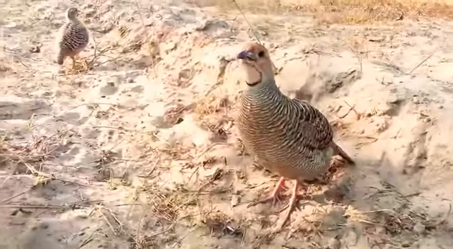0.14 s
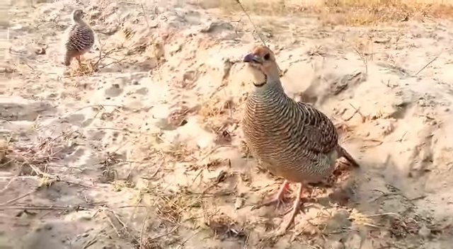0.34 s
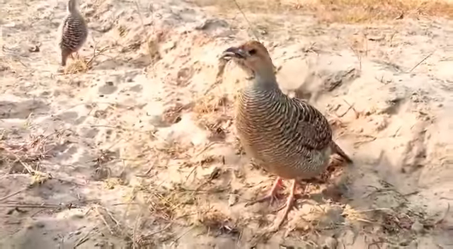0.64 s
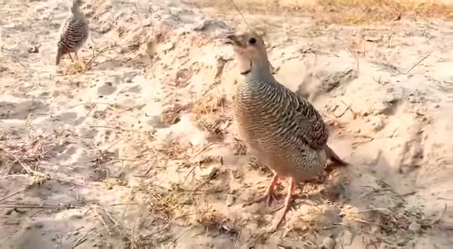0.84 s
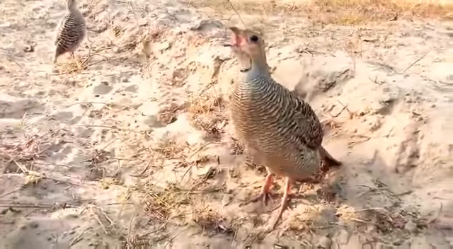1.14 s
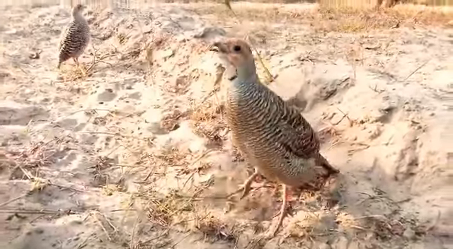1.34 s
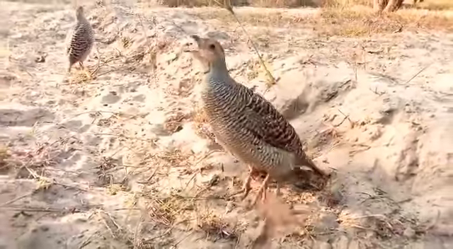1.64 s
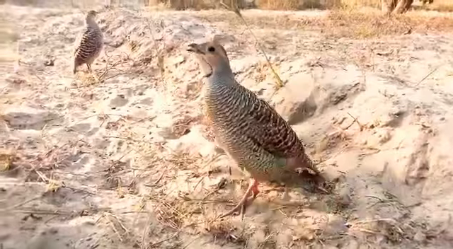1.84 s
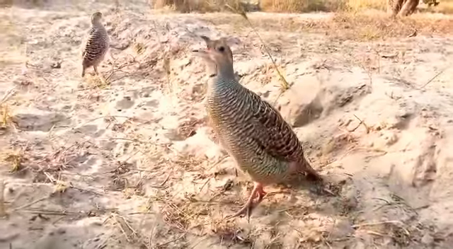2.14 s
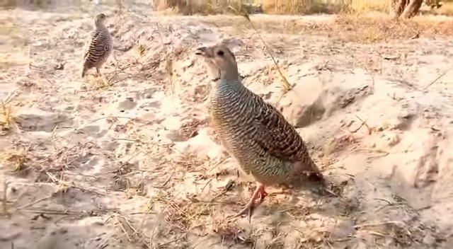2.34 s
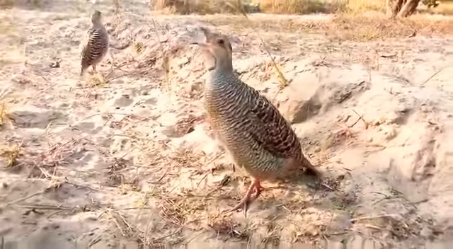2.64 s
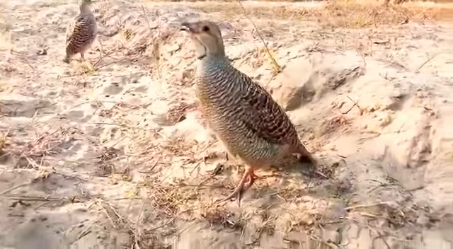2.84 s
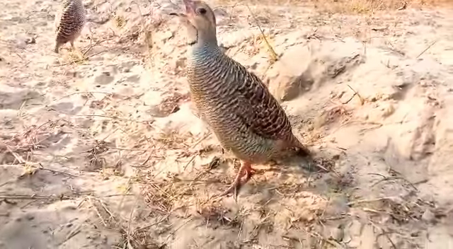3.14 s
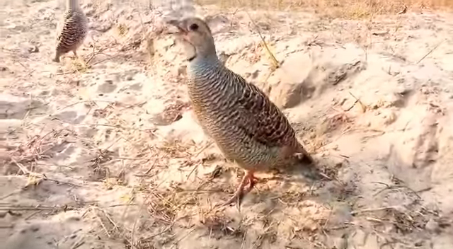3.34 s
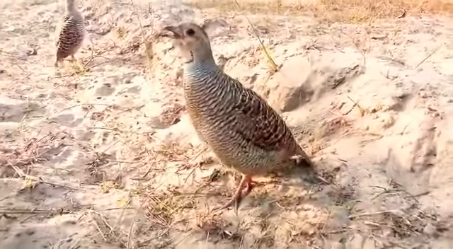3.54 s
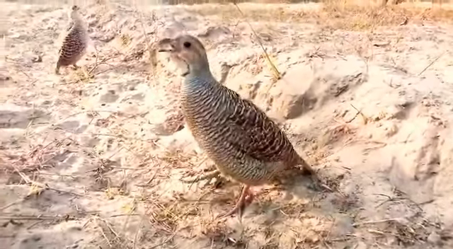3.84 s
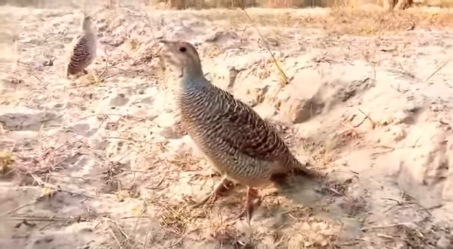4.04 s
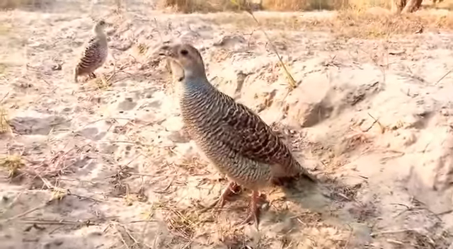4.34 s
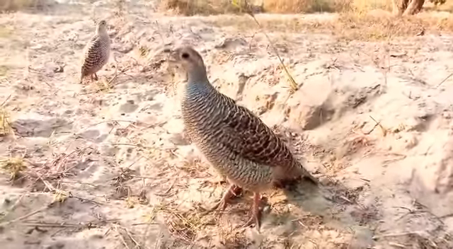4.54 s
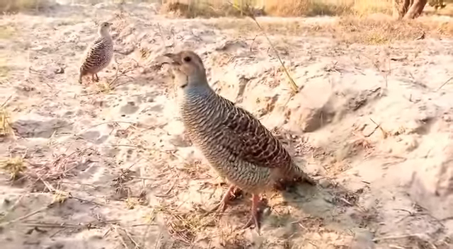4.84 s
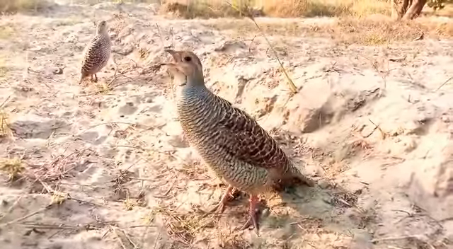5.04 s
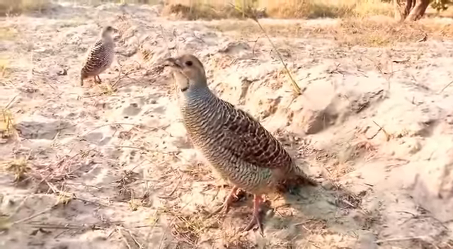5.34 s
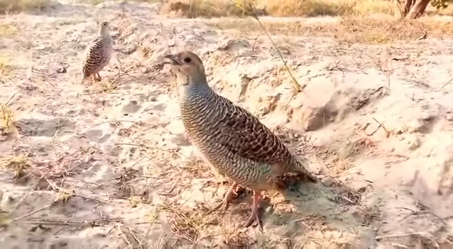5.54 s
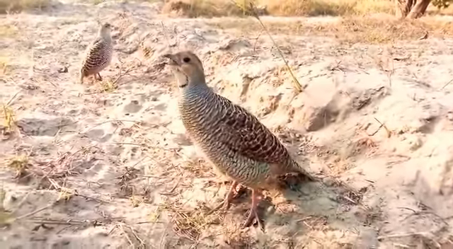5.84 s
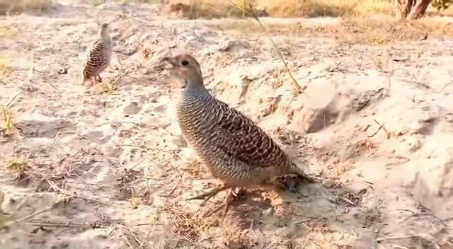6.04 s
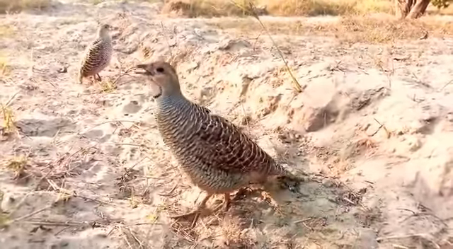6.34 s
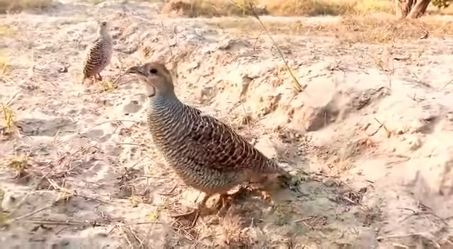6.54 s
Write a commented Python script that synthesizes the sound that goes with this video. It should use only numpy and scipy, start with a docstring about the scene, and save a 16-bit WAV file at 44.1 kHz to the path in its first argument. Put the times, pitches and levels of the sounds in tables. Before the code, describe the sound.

A quiet outdoor space with very faint hiss and low lumpy wind. In the first 0.2 seconds a distant hoarse caw is barely there, and a soft puff of wind bumps the microphone near 0.24. At about 0.25 to 0.45 a partridge close by gives one breathy shrill whistle, rising and dipping slightly at the end. From 0.5 it launches a fast, even run of thirteen phrases, roughly one every half second, lasting until about 6.7. The first starts without a cluck; later ones open with a short throaty cluck, then a hoarse lead-in snapping up to a piercing flat whistle, a rasp, one or mostly two short lower pipes, and a quick guttural falling tail. The phrases are loud, dry and strident, with brief gaps and a faint shrill echo from far trees. A thin falling chirp sounds distantly near 4.4.

```python
"""A ground bird calls nearby: one shrill whistle, then a fast run of phrases. A phrase is a cluck
(not in the first), lead-in, whistle, one or two pipes split by rasps, and a falling tail. Rough notes
are unsteady pulses through a throat; clean ones are sine stacks with breath. Far trees echo the bird
as sparse filtered taps, over wind of filtered noise, a puff, hiss, a pulsed caw and a gliding chirp."""
import sys
import numpy as np
from scipy import signal
from scipy.fft import rfft, irfft
from scipy.io import wavfile
from scipy.ndimage import uniform_filter1d

SR = 44100
rng = np.random.default_rng(int(sys.argv[2]) if len(sys.argv) > 2 else 0)


def put_to_file(sound):
    """Save the sound as 16-bit audio at rate SR, in the file named by the first command-line argument."""
    columns = np.atleast_2d(sound).T  # one column per channel
    safe = np.clip(columns, -1, 1)
    whole_steps = np.round(safe * 32767)
    wavfile.write(sys.argv[1], SR, whole_steps.astype(np.int16))


N = 295029
EDGE_HZ = 16200  # upper band limit

# throat colour with the beak open: [f/Hz, relative level/dB]
OPEN_BEAK = [(300, -39), (1100, -21), (1650, -20), (2300, -9), (3000, -2.5), (4500, 3.5), (6500, -4),
             (7300, -13.5), (9700, -19), (11500, -34), (14800, -23.5), (16300, -22)]
# throat colour with the beak shut: [f/Hz, relative level/dB]
SHUT_BEAK = [(300, -4.5), (600, -32), (1150, -23), (1800, -1.5), (2350, 6), (3300, -11), (4600, -14.5),
             (6600, -16.5), (8500, -31), (11500, -52.5), (14800, -34.5), (16300, -44)]


def gain_of(db):
    """Decibels to gain."""
    return 10 ** (np.asarray(db) / 20)


def evened(x):
    """Scales to rms 1."""
    return x / np.sqrt(np.mean(x ** 2) + 1e-20)


def read(points, hz):
    """Reads a spectrum table on a log-frequency axis."""
    f, value = np.transpose(points)
    return np.interp(np.log(hz + 1), np.log(f + 1), value)


def add(mix, s, sound):
    """Mixes a sound in at s seconds."""
    part = mix[round(s * SR):][:len(sound)]
    part += sound[:len(part)]


def wobble(shape, hz):
    """Smoothed noise of about rms 1 that changes about hz times a second."""
    width = max(round(SR / hz / 2), 1)
    raw = rng.standard_normal(shape)
    smooth = uniform_filter1d(uniform_filter1d(raw, width, -1), width, -1)
    return smooth * np.sqrt(1.5 * width)


def coloured(x, points):
    """Filters x by a spectrum table, to rms 1."""
    gains = gain_of(read(points, np.fft.rfftfreq(len(x), 1 / SR)))
    return evened(irfft(rfft(x) * gains, len(x)))


def along(length, places, values):
    """A curve over a note with rounded corners, its places given as shares of the length."""
    curve = np.interp(np.linspace(0, 1, round(length * SR)), places, values)
    return uniform_filter1d(curve, size=70, mode="nearest")


def stack(hz, rough, half_db, throat, dark_db=0):
    """Pulses at hz through the throat; unsteady membranes blur pitch, pulse size and the upper lines."""
    k = np.arange(1, 41)[:, None]  # line numbers; half_db sets the odd ones
    hz = hz * (1 + .06 * rough * wobble(len(hz), 200))
    turns = np.cumsum(hz) / SR
    patches_db = 4 * wobble((len(k), len(hz)), 70)  # single lines swell and fade
    tilt_db = -dark_db * np.log2(np.maximum(k * hz / 2600, 1))  # a closing beak dulls the treble
    line_db = read(throat, k * hz) + (k % 2) * half_db + patches_db + tilt_db
    gains = gain_of(line_db) * (k * hz < EDGE_HZ)
    depth = 1.3 * rough * np.clip(k * hz / 2800, .12, 3)
    stray = wobble(gains.shape, 400) + 1j * wobble(gains.shape, 400)
    blur = (1 + depth * stray) / np.sqrt(1 + 2 * depth ** 2)
    start_phase = 1.2 * np.pi * rng.random(k.shape)  # random for each line, which softens the pulses
    lines = (gains * blur * np.exp(1j * (2 * np.pi * k * turns + start_phase))).real.sum(0)
    level = np.sqrt((gains ** 2).sum(0) / 2)
    swing = gain_of(4.0 * rough * wobble(len(hz), 300))  # uneven pulse size
    return lines / level * swing * signal.windows.tukey(len(hz), .04)


def tone(hz, orders, half_db, breath_db):
    """A clean note: sines at multiples of its pitch, half lines between them, and a little breath."""
    turns = np.cumsum(hz) / SR
    lines = 0
    for k, db in orders:
        line_db = db + half_db * (k % 1 > 0)
        lines = lines + gain_of(line_db) * np.sin(2 * np.pi * k * turns)
    breath = gain_of(breath_db) * coloured(rng.standard_normal(len(hz)), OPEN_BEAK)
    return (evened(lines) + breath) * signal.windows.tukey(len(hz), 180 / len(hz))


def hiss():
    """Faint white noise."""
    return gain_of(-72.5) * rng.standard_normal(N)


def wind():
    """Lumpy low rumble of filtered noise, and one puff on the microphone: a swelling, dying thump."""
    # rumble spectrum: [f/Hz, relative level/dB]
    rumble_colour = [(12, -50), (20, -21), (91, -8), (165, -13), (198, -19), (233, -32), (700, -32),
                     (910, -92), (1540, -120)]
    # puff: [t/s, f/Hz, level/dB, rise/s]
    puff = (.237, 145, -28, .012)
    gusts_db = 2.5 * wobble(N, 9)
    out = gain_of(-64.5 + gusts_db) * coloured(rng.standard_normal(N), rumble_colour)
    s, hz, db, rise = puff
    t = np.arange(SR // 10) / SR
    swell = (t / rise) ** 2 * np.exp(2 - 2 * t / rise)  # reaches 1 at the rise time
    body = np.sin(2 * np.pi * hz * t) + 0.23 * wobble(len(t), 480)
    add(out, s, gain_of(db) * swell * body)
    return out


def far_birds():
    """A hoarse caw of rough pulses at the start, and a thin falling sine chirp."""
    # caw contour: [t/s, f/Hz, level/dB]
    caw = [(.02, 423, -82), (.07, 437, -66), (.2, 402, -69), (.23, 396, -79)]
    # caw throat colour: [f/Hz, relative level/dB]
    caw_throat = [(400, -25), (1300, -1), (1750, 5), (2200, -5), (2800, -33), (3800, -10), (9000, -45)]
    # chirps: [t/s, length/s, start f/Hz, end f/Hz, peak level/dB]
    chirps = [(4.352, 0.081, 3650, 2550, -51)]
    out = np.zeros(N)
    s, hz, db = np.transpose(caw)
    t = np.arange(s[0], s[-1], 1 / SR)
    voice = stack(np.interp(t, s, hz), 0.47, 0, caw_throat)
    add(out, s[0], gain_of(np.interp(t, s, db)) * voice)
    for s, length, a_hz, b_hz, db in chirps:
        glide = np.geomspace(a_hz, b_hz, round(length * SR))
        chirp = np.sin(2 * np.pi * np.cumsum(glide) / SR) * np.hanning(len(glide))
        add(out, s, gain_of(db) * chirp)
    return out


def trees(x):
    """Sparse late echoes; mostly the shrill band comes back."""
    t = np.arange(SR // 2) / SR
    sparse = rng.standard_normal(len(t)) * (rng.random(len(t)) < .05)
    taps = sparse * gain_of(-60 * t / 0.57) * np.clip(t / 0.042, 0, 1)  # falls at 60 dB per 0.57 s
    taps = coloured(taps, [(1200, -15), (1900, -6.5), (3000, -7.0), (7500, -5.5), (9000, -1), (16000, -36)])
    return signal.fftconvolve(x, taps / np.linalg.norm(taps))[:N]


def cry():
    """A slightly unsteady whistle in a cloud of breath."""
    # whistle contour: [t/s, f/Hz, level/dB]
    contour = [(.246, 2950, -35), (0.261, 3070, -27), (.272, 3190, -12), (.3, 3430, -11), (.345, 3594, -10),
               (.385, 3610, -12), (0.413, 3495, -15), (0.433, 3235, -23.5), (.45, 3060, -76)]
    # whistle lines: [multiple of the pitch, relative level/dB]
    cry_orders = [(1, 0), (2, -29), (3, -35)]
    # breath contour: [t/s, level/dB]
    breath_contour = [(.234, -66), (.243, -32.5), (.27, -32.5), (.38, -30), (.44, -36.5), (.478, -46.5),
                      (.49, -83)]
    # breath spectrum: [f/Hz, relative level/dB]
    breath_colour = [(180, -80), (300, -65), (1180, -53.5), (3120, -34.5), (3510, -25.5), (3690, -29),
                     (4080, -47.5), (7080, -40), (8090, -51.5), (10900, -46), (16300, -56)]
    t = np.arange(N // 10) / SR
    s, hz, db = np.transpose(contour)
    pitch = uniform_filter1d(np.interp(t, s, hz), size=600) * (1 + 0.0072 * wobble(len(t), 400))
    level = gain_of(np.interp(t, s, db, -120, -120) + 1.1 * wobble(len(t), 100))
    clean = tone(pitch, cry_orders, half_db=0, breath_db=-32.5) * uniform_filter1d(level, size=100)
    breath_level = gain_of(np.interp(t, *np.transpose(breath_contour), -120, -120))
    breath = coloured(rng.standard_normal(len(t)), breath_colour)
    return clean + breath * uniform_filter1d(breath_level, size=100)


def cluck(length, early_hz, peak_db, held_db, half_db):
    """Pulses rise hoarsely, hold, jump up a step and sag; half_db sets the odd lines in the middle."""
    late = 1.105  # upward jump as a ratio
    steps = np.array([.62, .97, 1, late, .96 * late, .78 * late, .72 * late])
    hz = along(length, [0, .28, .51, .54, .7, .82, 1], early_hz / 2 * steps)
    rise_db, sag_db = peak_db - 3, peak_db - 8
    db = along(length, [0, .04, .2, .36, .5, .57, .72, .86, 1],
               [-45, rise_db - 6.5, rise_db, held_db - .6, held_db, peak_db, peak_db - .6, sag_db, -44])
    half = along(length, [0, .22, .32, .68, .8, 1], [0, -3, half_db, half_db, -4, 0])
    hoarse = along(length, [0, .2, .32, .72, 1], [.35, .4, .05, .05, .2])
    dark_db = along(length, [0, .7, 1], [-1, 0, 8])
    return gain_of(db) * stack(hz, hoarse, half, SHUT_BEAK, dark_db)


def lead(length, arch_hz, hollow_hz, hollow_db):
    """A bright arch of pulses, a short hollow note with a sine croak, and a snap into the whistle."""
    length = length + .004  # it overlaps the whistle
    arch_db = -16 + 0.02 * (arch_hz - 827)  # a higher arch is a louder one
    hz = along(length, [0, .2, .33, .45, .62, .66, 1],
               [.7 * arch_hz, .86 * arch_hz, .99 * arch_hz, arch_hz, .86 * arch_hz,
                hollow_hz / 2, .51 * hollow_hz])
    db = along(length, [0, .05, .42, .62, .85, .96, 1],
               [-40, arch_db - 9, arch_db, hollow_db, hollow_db, hollow_db + 3.0, hollow_db - 1])
    half = along(length, [0, .62, .66, 1], [-5.5, -1.0, -9.5, 9.5])
    hoarse = along(length, [0, .2, .3, .58, .7, .86, 1], [.5, .3, .06, .08, .25, .25, .8])
    voice = gain_of(db) * stack(hz, hoarse, half, OPEN_BEAK)
    croak_shape = along(length, [0, .55, .68, .9, 1], [0, 0, 1, 1, 0])
    croak = croak_shape * np.sin(2 * np.pi * np.cumsum(2 * hz) / SR)
    croak_db = hollow_db + read(SHUT_BEAK, hollow_hz) + 3.5  # louder when it nears the throat resonance
    return voice + gain_of(croak_db + 3 * wobble(len(hz), 300)) * croak


def whistle(length, hz, level_db, swell_db, half_db):
    """A clean note slides up into a flat pitch, and trails off under the next rasp."""
    # multiples and half multiples: [multiple of the pitch, relative level/dB]
    whistle_orders = [(1, 5), (1.5, 0.5), (2, -1), (2.5, -4.5), (3, -13.5), (3.5, -17.5), (4, -19.5),
                      (4.5, -12.5)]
    whole = max(0.087, length + .004)  # seconds with the trail; one that breaks early trails longer
    places = np.array([0, .004, .012, .35 * length, .68 * length, length - .004, length,
                       whole - .002, whole]) / whole
    pitch = hz * along(whole, places, [.92, .985, .998, 1, 1, .998, .995, .98, .93])
    a_db, c_db = level_db - 0.78 * swell_db, level_db - 0.98 * swell_db  # start and end of the swell
    db = along(whole, places, [a_db - 8, a_db, a_db, level_db - .4, level_db - .4,
                               c_db, c_db + .4, c_db - 2.5, c_db - 8])
    return gain_of(db) * tone(pitch, whistle_orders, half_db, breath_db=-29.5)


def pipe(length, a_hz, sag_hz, a_db, fade_db):
    """A short clean note bends downwards; strong half lines bring a waver."""
    # multiples and half multiples: [multiple of the pitch, relative level/dB]
    pipe_orders = [(.5, 2.5), (1, 4.5), (1.5, 15.5), (2, -0.5), (2.5, 6), (3, -9), (3.5, -25), (4, -25),
                   (5, -74)]
    length = length + .005
    b_hz, b_db = a_hz - sag_hz, a_db + fade_db
    half_db = -13 if a_hz > 2750 else -44  # half lines grow strong in a pipe pushed high
    pitch = along(length, [0, .1, .28, .6, .85, 1],
                  [.96 * a_hz, .99 * a_hz, a_hz, .65 * a_hz + .35 * b_hz, b_hz, .97 * b_hz])
    pitch *= 1 + .05 * gain_of(half_db) * wobble(len(pitch), 250)
    db = along(length, [0, .1, .3, .72, 1], [a_db - 22.5, a_db - 3.0, a_db, b_db + 0.1, b_db - 10.5])
    return gain_of(db) * tone(pitch, pipe_orders, half_db, breath_db=-23.0)


def rasp(length, burst_db, start_hz, dip_db, close_db):
    """Chaotic pulsing between two clean notes, at times almost periodic."""
    length = length + .006  # it overlaps both neighbours
    dip_db, close_db = burst_db + dip_db, burst_db + close_db
    hz = along(length, [0, .12, .4, .65, .8, 1], [start_hz, start_hz, 590, 540, 600, 780])
    db = along(length, [0, .14, .3, .65, .76, .86, 1],
               [burst_db - 13.5, burst_db - 4.0, burst_db, dip_db, dip_db, close_db, close_db - 12])
    hoarse = along(length, [0, .2, .45, .62, .8, 1], [.55, .25, .28, .6, .3, .5])
    bright = 1.43 * stack(hz, hoarse, -5.5, OPEN_BEAK)
    dull = .5 * stack(hz, hoarse / 2, -17, SHUT_BEAK)
    return gain_of(db) * (bright + dull)


def tail(length, b_hz, peak_db):
    """Pulses drop in pitch while the beak shuts; a strained tail arches first, bright and even."""
    a_hz = 735 + .6 * (b_hz - 524.5)  # the start follows the middle pitch in part
    strained = b_hz > 600
    if strained:
        hz = along(length, [0, .1, .3, .5, .7, 1],
                   [.93 * a_hz, a_hz, .93 * a_hz, b_hz, .8 * b_hz, .62 * b_hz])
        late_db = peak_db - 3.5
        half_points = [-12, -5, -13, 7]
    else:
        hz = along(length, [0, .08, .25, .5, 1], [a_hz, a_hz, .25 * a_hz + .8 * b_hz, b_hz, .84 * b_hz])
        late_db = peak_db - 8.5
        half_points = [-15.5, -4.5, -6.5, 0.5]
    db = along(length, [0, .04, .15, .3, .45, .75, 1],
               [peak_db - 13, peak_db - 6.5, peak_db, peak_db - 1.0, late_db, late_db - 2.5, -45])
    half = along(length, [0, .35, .5, 1], half_points)
    hoarse = along(length, [0, .1, .6, 1], [.45, .1, .14, .35])
    voice = stack(hz, hoarse, half, SHUT_BEAK, along(length, [0, .6, 1], [-6, -2, 8]))
    if strained:  # the beak is still open over the arch
        gape = along(length, [0, .35, .55, 1], [.8, .8, 0, 0])
        open_voice = stack(hz, hoarse / 2, half, OPEN_BEAK, dark_db=7)
        voice = np.sqrt(1 - gape) * voice + np.sqrt(abs(gape)) * open_voice
    return gain_of(db) * voice


def bird():
    """The opening cry and all syllables in one voice; rasps fill the gaps between clean notes."""
    # clucks: [t/s, length/s, f/Hz, peak level/dB, held middle level/dB, half lines/dB]
    clucks = [(0.876, 0.065, 1037, -20, -22.5, -2), (1.357, .065, 1158, -16, -16, -11),
              (1.833, 0.062, 1168, -15, -16.5, -11), (2.316, 0.061, 1183, -15.5, -16.5, -8.5),
              (2.797, 0.065, 1190, -17, -13, -14.5), (3.287, 0.061, 1175, -16.5, -11, -20),
              (3.78, 0.061, 1132, -18.5, -11.5, -18), (4.273, 0.062, 1126, -17.5, -15, -8),
              (4.773, .057, 1112, -16.5, -18, 0), (5.281, 0.056, 985, -18, -18, 1),
              (5.791, 0.055, 988, -17.5, -18.5, 1), (6.296, 0.055, 912, -18.5, -21.5, -5.5)]
    # lead-ins, each lasting until its whistle: [t/s, arch f/Hz, hollow f/Hz, hollow level/dB]
    leads = [(0.513, 650, 1354, -31), (1.017, 732, 1325, -28.5), (1.477, 811, 1668, -22.5),
             (1.952, 812, 1720, -27.5), (2.433, 767, 1704, -26.5), (2.917, 813, 1614, -23),
             (3.404, 803, 1610, -25), (3.898, 803, 1305, -25), (4.4, 794, 1310, -23.5),
             (4.902, 813, 1327, -24), (5.406, 783, 1308, -23), (5.916, 790, 1340, -27),
             (6.43, 779, 1313, -26)]
    # whistles: [t/s, clean length/s, f/Hz, level/dB, swell of the middle/dB, half lines/dB,
    # drive of the following rasp/dB]
    whistles = [(0.556, 0.061, 3072, -18, 0.5, -13, -20), (1.059, 0.051, 3143, -15, 4.5, -9, -19.5),
                (1.523, 0.063, 3182, -11.5, 5, -23, -21.5), (1.994, 0.074, 3178, -11.5, 4, -20, -20),
                (2.476, 0.068, 3184, -12, 4, -24, -20.5), (2.96, 0.067, 3186, -12.5, 4, -17, -20.5),
                (3.449, 0.074, 3184, -14, 3, -13, -19), (3.943, .073, 3167, -14, 3, -13.5, -20),
                (4.44, .076, 3178, -13.5, 3.5, -14, -20.5), (4.943, 0.078, 3160, -14.5, 1.5, -12.5, -19.5),
                (5.446, 0.083, 3164, -14, 2.3, -13, -19.5), (5.959, .08, 3163, -14.5, 2.2, -12, -21),
                (6.471, 0.081, 3172, -15, 1.2, -10, -20.5)]
    # pipes: [t/s, length/s, f/Hz, sag/Hz, level/dB, level change to the end/dB]
    pipes = [(0.669, 0.036, 2898, 148, -13, -1), (1.147, .025, 2534, 25, -16.5, -2.5),
             (1.195, 0.031, 2578, 236, -15.5, -1), (1.623, .015, 2500, 51, -11.5, -8.5),
             (1.67, 0.024, 2556, 145, -13, -3), (2.102, 0.025, 2520, 41, -12.5, -6),
             (2.155, .023, 2522, 147, -13, -3), (2.579, 0.016, 2520, 113, -14, -3),
             (2.625, 0.028, 2580, 186, -11, -2.5), (3.064, .024, 2526, 92, -12.5, -1),
             (3.112, .031, 2576, 246, -13, 1.5), (3.561, .017, 2523, 86, -12, -1.5),
             (3.608, 0.033, 2566, 201, -13.5, 3), (4.05, 0.021, 2520, 58, -11.5, -4.5),
             (4.097, 0.032, 2570, 228, -12, -2), (4.552, 0.024, 2494, 59, -11, -10),
             (4.602, 0.03, 2590, 274, -11, -2.5), (5.057, .021, 2492, 12, -10.5, -9),
             (5.104, 0.029, 2558, 210, -11, -1), (5.569, .016, 2484, 65, -11.5, -13),
             (5.615, 0.025, 2553, 168, -13, -2.5), (6.074, .017, 2470, 83, -14.5, -7.5),
             (6.126, 0.022, 2506, 151, -11.5, -6.5), (6.599, .014, 2470, 0, -15, -2),
             (6.644, 0.021, 2513, 96, -14, -3.5)]
    # tails: [t/s, length/s, middle f/Hz, peak level/dB]
    tails = [(0.719, 0.079, 675, -16), (1.226, .041, 546, -13.5), (1.694, 0.039, 537, -16),
             (2.176, 0.04, 533, -17), (2.653, 0.045, 518, -16), (3.141, 0.044, 517, -17),
             (3.636, 0.048, 511, -16), (4.128, 0.046, 491, -16.5), (4.632, .043, 498, -17),
             (5.134, 0.042, 499, -16.5), (5.641, .048, 512, -16.5), (6.145, 0.045, 506, -15),
             (6.664, 0.05, 528, -16.5)]
    # rasp after a whistle: [start f/Hz, dip against its burst/dB, close against its burst/dB]
    after_whistle = (430, -5.5, 1.8)
    # rasp after a pipe: [start f/Hz, dip against its burst/dB, close against its burst/dB]
    after_pipe = (760, -11.5, 1.6)
    early_s = .003  # clean notes begin this far under the end of the rough one before
    out = np.zeros(N)
    add(out, 0, cry())
    for rows, voice in ((clucks, cluck), (tails, tail)):
        for s, *row in rows:
            add(out, s, voice(*row))
    starts = np.sort([row[0] for row in pipes + tails])
    for (s, *row), (until, length, *note, rasp_db) in zip(leads, whistles):
        add(out, s, lead(until - s, *row))
        add(out, until - early_s, whistle(length + early_s, *note))
        gap = starts[starts > until][0] - until - length
        add(out, until + length - .003, rasp(gap, rasp_db, *after_whistle))
    for s, length, *note in pipes:
        add(out, s - early_s, pipe(length + early_s, *note))
        gap = starts[starts > s][0] - s - length
        if gap > .012:  # shorter gaps after a pipe get no rasp
            add(out, s + length - .003, rasp(gap, -19, *after_pipe))
    return out


def scene():
    """Hiss, wind, far birds, echo and the near bird."""
    near = bird()
    echo = gain_of(-32.0) * trees(near)
    return (near + echo + far_birds() + wind() + hiss())[None]


def record(dry):
    """A suppressor lowers the rumble while the band above it is loud; soft overload; the band limit."""
    low = signal.sosfiltfilt(signal.butter(4, 260, fs=SR, output="sos"), dry)
    high = dry - low
    high_db = 10 * np.log10(abs(uniform_filter1d(high ** 2, size=900)) + 1e-12)
    duck = gain_of(-.45 * np.clip(high_db + 42, 0, 25))  # starts above -42 dB
    heard = 1.3 * np.tanh((high + duck * low) / 1.3)
    band_limit = signal.firwin(511, EDGE_HZ, window=("kaiser", 9), fs=SR)
    return signal.oaconvolve(heard, band_limit[None], "same")


dry = scene()
out = record(dry)
put_to_file(out)
```